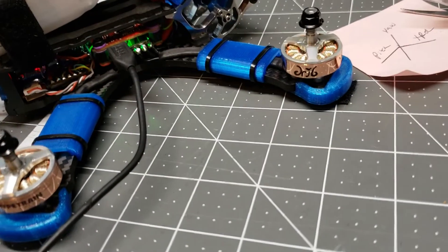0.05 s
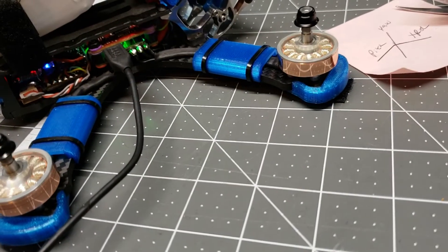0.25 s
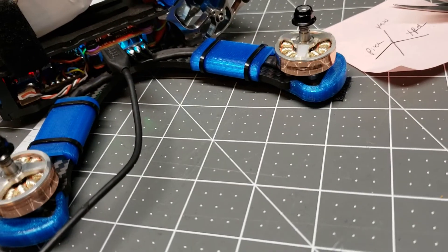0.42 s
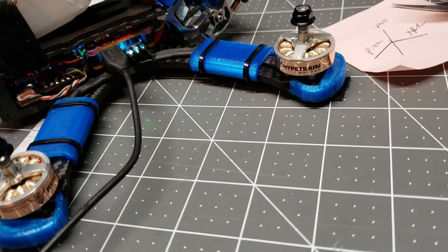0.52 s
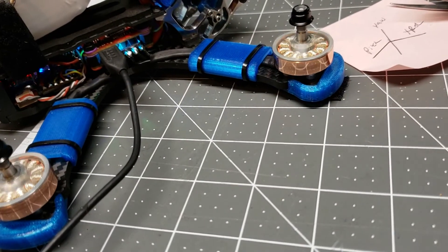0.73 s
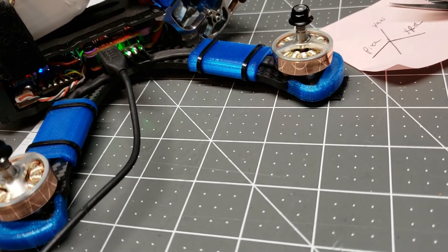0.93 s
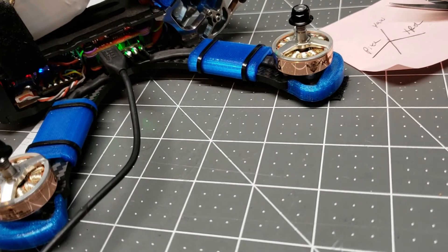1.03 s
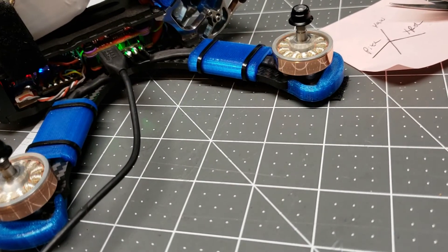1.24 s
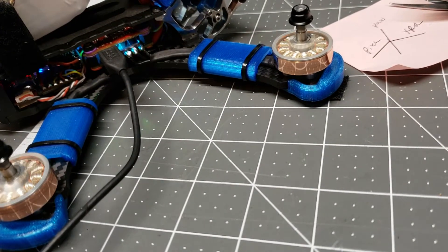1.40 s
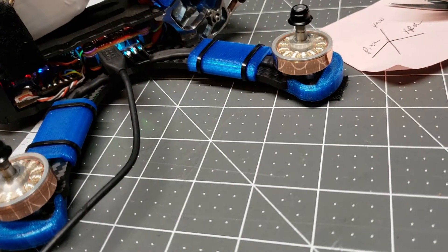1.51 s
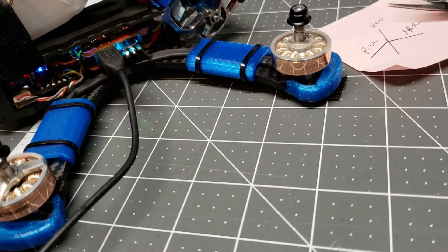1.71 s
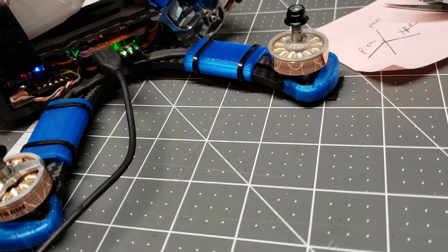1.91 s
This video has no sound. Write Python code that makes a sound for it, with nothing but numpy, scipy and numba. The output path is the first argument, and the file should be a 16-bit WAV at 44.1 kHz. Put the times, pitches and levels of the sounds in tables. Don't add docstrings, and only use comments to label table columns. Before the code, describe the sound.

Small electric drone motors spin up in three quick bursts, each opening with a rough tick and ending in a hard brake; the last holds longest, close to a phone in a small room.

```python
import sys
import numpy as np
from scipy import signal
from scipy.fft import rfft, irfft
from scipy.io import wavfile
from scipy.ndimage import uniform_filter1d
from numba import njit

SR = 44100
rng = np.random.default_rng(int(sys.argv[2]) if len(sys.argv) > 2 else 0)


def log_audio(samples):
    frames = np.atleast_2d(samples).T
    limited = np.clip(frames, -1, 1)
    pcm = np.round(limited * 32767).astype(np.int16)
    wavfile.write(sys.argv[1], SR, pcm)


def undo_db(level):
    steps = np.asarray(level, float) / 20
    return 10 ** steps


N = 85995
T = np.arange(N) / SR


def curve(rows, col=1):
    return np.interp(T, [r[0] for r in rows], [r[col] for r in rows])


def unit(x):
    return x / np.sqrt(np.mean(x ** 2))


def noise():
    return rng.standard_normal(N)


def fade(start_s, fall_s):
    return np.exp(-np.clip(T - start_s, 0, None) / fall_s) * (T > start_s)


def turning(hz, wobble, rate):
    return 2 * np.pi * np.cumsum(hz * (1 + wobble * walk(rate))) / SR


@njit
def svf(x, hz, width):
    y, b, l = np.empty(len(x)), 0., 0.
    g, k = np.tan(np.pi * hz / SR), width / hz
    for i in range(len(x)):
        v = (b + g * (x[i] - l)) / (1 + g * (g + k))
        b, l, y[i] = 2 * v - b, l + 2 * g * v, k * v
    return y


def body(x, peaks):
    return sum((-1) ** k * undo_db(db) * svf(x, 1. * f, 1. * w) for k, (f, w, db) in enumerate(peaks))


def walk(rate):
    k = int(SR / rate)
    steps = np.repeat(rng.standard_normal(N // k + 1), k)
    return 1.4 * uniform_filter1d(uniform_filter1d(steps, k), k)[:N]


def hiss(points):
    p = np.array(points, float)
    f = np.fft.rfftfreq(N, 1 / SR) + 1
    colour_db = np.interp(np.log(f), np.log(p[:, 0]), p[:, 1], left=-90, right=-90)
    return unit(irfft(rfft(noise()) * undo_db(colour_db), N))


def pan(x, db, lag_ms=0.):
    f = np.fft.rfftfreq(N, 1 / SR)
    half_turn = np.pi * f * lag_ms / 1000
    return np.array([irfft(rfft(x) * np.exp(-1j * half_turn * s), N) * undo_db(s * db / 2) for s in (1, -1)])


# [twitch t/s, spin-up t/s, brake t/s, top electrical f/Hz, twitch level/dB, tick level/dB]
BLIPS = [
    (.227, 0.264, .348, 722, -24.5, 4),
    (.778, 0.811, 0.869, 705, -30, -3.5),
    (1.258, 1.290, 1.568, 741, -32.5, -1),
]


def speed():
    rise_s, settle_s, settle_share, brake_s = .027, .08, .07, .042
    hz = np.zeros(N)
    for _, on, off, top, *_ in BLIPS:
        u = np.clip(T - on, 0, off - on)
        climb = 1 - (1 - settle_share) * np.exp(-u / rise_s) - settle_share * np.exp(-u / settle_s)
        hz += top * climb * np.exp(-np.clip(T - off, 0, None) / brake_s)
    return hz


# [t/s, level/dB]
STRAIN = [
    [(.262, -46.5), (.267, -30.5), (.276, -17), (.29, -15.5), (.31, -21), (.33, -15.5), (.362, -24),
     (.385, -17.5), (.41, -30)],
    [(.81, -45), (.823, -19.5), (.835, -18), (.846, -18), (.856, -23), (.87, -22), (.879, -18.5),
     (.895, -22), (.92, -44.5)],
    [(1.292, -49), (1.304, -18.5), (1.316, -20.5), (1.328, -22), (1.34, -28), (1.37, -36.5)],
    [(1.566, -40), (1.572, -28), (1.579, -28), (1.588, -20), (1.6, -23.5), (1.626, -34), (1.64, -47)],
]
# [t/s, level/dB]
KNOCKS = [(0.267, -20.5), (.2737, -10.5), (0.2942, -15.5), (0.3027, -18), (0.313, -15.5), (0.349, -16),
          (0.361, -11.5), (0.379, -17), (0.8232, -17), (0.8417, -17.5), (0.847, -27), (0.8762, -22),
          (0.883, -25), (0.904, -24), (1.3054, -21), (1.325, -19), (1.5735, -24), (1.5844, -15),
          (1.597, -25)]


def spin_strain():
    force = 0
    for rows in STRAIN:
        start, end = rows[0][0] - .004, rows[-1][0] + 0.025
        force = force + undo_db(curve([(start, -90)] + list(rows) + [(end, -90)]))
    ticks = sum(undo_db(-23.5) * fade(b[2], 0.0081) for b in BLIPS)
    knocks = sum(undo_db(db) * fade(s, 0.0034) for s, db in KNOCKS)
    return force + ticks + knocks


# [t/s after its start, level/dB]
TWITCH = [(0, -39.5), (.001, -14), (.008, -0.5), (.014, 5), (.022, -10.5), (.036, -5), (.045, -27.5)]


def twitch_strain():
    force = 0
    for s, _, _, _, db, tick_db in BLIPS:
        shape = [(s - .001, -90)] + [(s + a, b) for a, b in TWITCH] + [(s + 0.05, -90)]
        force = force + undo_db(db + curve(shape)) + undo_db(db + tick_db) * fade(s, 0.0026)
    return force


# [f/Hz, width/Hz, depth 0-1]
WHIRR_DIPS = [(9500, 260, 1), (8330, 160, .6)]


def dips(x):
    return x - sum(np.clip(d, 0, 1) * svf(x, 1. * f, 1. * w) for f, w, d in WHIRR_DIPS)


ORDER = (1, 2, 3, 12, 14, 15, 28)
TONES = [-30, -36, -28, -25, -6, -16, -20]
# [f/Hz, width/Hz, level/dB]
BELL = [(343, 99, -18), (489, 12, -15.5), (637, 56, -20.5), (1924, 960, -23), (4270, 1180, -8.5),
        (6253, 790, -1), (7127, 456, 3), (7717, 530, 1.5), (9400, 1700, -9.5), (14000, 3700, -14.5)]
# [f/Hz, width/Hz, level/dB]
TWITCH_BODY = [(334, 130, -14), (2143, 323, -9.5), (4170, 610, -2.5), (6040, 380, 1.5), (7430, 1000, 2),
               (9100, 560, -9)]
# [f/Hz, level/dB per Hz]
WHIRR = [(59, -64), (100, -25), (621, -27), (721, -21.5), (991, -25.5), (2220, -8), (6840, -9.5),
         (7610, -7.5), (16000, -11)]
# [f/Hz, width/Hz, level/dB]
BELL_RING = [(3993, 830, -44.5), (7600, 36, -49.5)]


def motor(hz, spins, twitches):
    phase = turning(hz, 0.0012, 60) + 6 * rng.random()
    once_a_turn = np.sin(phase / 7)
    run = (hz / 738) ** 3.0
    rasp = noise() * undo_db(1.4 * walk(500) + 0.63 * once_a_turn)
    forced = 0
    for k, db in zip(ORDER, TONES):
        tone = undo_db(db + min(k, 5.0) * walk(70)) * np.sin(k * phase) * (k * hz < 16000)
        forced = forced + tone / (1 + (k * hz / 8300) ** 10)
    forced = forced * np.clip(hz / 600, 0, 1) ** 2.0
    rough = unit(body(rasp, BELL)) * spins + unit(body(rasp, TWITCH_BODY)) * twitches
    out = undo_db(-4.0) * rough + undo_db(6.0) * body(forced * spins, BELL)
    whirr_db = -34.5 + 0.5 * walk(300) + 2.0 * once_a_turn
    out = out + run * undo_db(whirr_db) * dips(hiss(WHIRR))
    ringing = sum(undo_db(db + 4.5) * unit(svf(noise(), 1. * f, 1. * w)) for f, w, db in BELL_RING)
    return out + run ** 2 * ringing


# [speed share, level/dB, pan/dB, port lag/ms]
MOTORS = [(1.0, -3.5, 6.5, 0.092), (.986, -1.5, -11.5, -0.2616), (1.002, -5, 7, 0.592)]


def motors(hz, spins, twitches):
    return sum(pan(undo_db(db) * motor(hz * share, spins, twitches), side, lag) for share, db, side, lag in MOTORS)


RUN_DB = (-40, -52, -42, -40, -39, -45, -62)
PULL_DB = (-20, -44, -21)
# [t/s, level/dB]
HUM_EASE_DB = [(1.46, 0), (1.51, -9)]
# [t/s, level/dB]
PULLS = [(.2, 0), (.5, 0), (.7, -6), (1.1, -6), (1.2, -10)]


def song(hz, spins, hum_db, whine_db):
    phase = turning(hz, .002, 90)
    powered = uniform_filter1d(1. * (np.gradient(hz) >= 0), size=200)
    held = 0
    for k, db in zip(ORDER, RUN_DB):
        extra_db = hum_db + curve(HUM_EASE_DB) if k == 1 else whine_db
        held = held + undo_db(db + extra_db + 2 * walk(30)) * np.sin(k * phase)
    pull = sum(undo_db(db + whine_db + 2 * walk(60)) * np.sin(k * phase) for k, db in zip(ORDER, PULL_DB))
    effort = uniform_filter1d(spins, size=900) * undo_db(curve(PULLS))
    return powered * ((hz / 735) ** 9 * held + effort * (hz / 620) ** 5 * pull)


# [speed share, hum level/dB, whine level/dB, pan/dB, port lag/ms]
VOICES = [(1.0, -14, 1, -2, 0.), (.986, 4, -8, 1, .4)]


def songs(hz, spins):
    return sum(pan(song(hz * share, spins, hum, whine), side, lag) for share, hum, whine, side, lag in VOICES)


# [t/s, level/dB]
RING_DB = [(1.33, -85), (1.36, -30), (1.41, -40), (1.43, -30.5), (1.565, -26), (1.575, -81.5)]


def ring():
    return undo_db(curve(RING_DB) + 1.5 * walk(38)) * np.sin(turning(7810, 0.00042, 88))


# [t/s, electrical f/Hz]
COAST_HZ = [(1.68, 515), (1.73, 480), (1.776, 400), (1.832, 341), (1.91, 251), (1.96, 208)]
# [t/s, level/dB]
COAST = [(1.6, -130), (1.7, -75), (1.73, -64), (1.75, -72), (1.77, -68), (1.8, -59), (1.832, -63),
         (1.866, -65), (1.96, -68)]
COAST_ORDER = (2.0, 9, 12, 14, 24)
COAST_DB = [-8, -22, 2, -12, -24]
# [f/Hz, width/Hz, level/dB]
COAST_BODY = [(900, 120, 0), (3600, 2500, 0), (6250, 250, 9), (8900, 500, 6)]


def coast():
    phase = turning(curve(COAST_HZ), .006, 150)
    tones = sum(undo_db(db + 4 * walk(50)) * np.sin(k * phase) for k, db in zip(COAST_ORDER, COAST_DB))
    bearing = undo_db(-11) * unit(svf(noise(), 2800., 2200.0))
    return body(tones + bearing, COAST_BODY) * undo_db(curve(COAST))


# [t/s, level/dB]
JOLTS = [(0.237, -38.5), (0.272, -44.5), (0.301, -44), (0.357, -35.5), (.378, -40), (.79, -52.5),
         (0.828, -46.5), (.85, -45.5), (0.884, -39.5), (1.269, -50), (1.302, -45), (1.325, -44),
         (1.584, -40), (1.6, -50)]
# [f/Hz, width/Hz, level/dB]
JOLT_MODES = [(86, 82, 1), (166, 190, -1.5), (445, 120, -1)]


def jolts():
    push = sum(undo_db(db) * fade(s, 0.012) for s, db in JOLTS)
    return undo_db(19.0) * body(push * noise(), JOLT_MODES)


def bench():
    t = T - BLIPS[-1][2]
    level = undo_db(-48 + walk(25) - 60 * np.abs(t) / .62)
    return level * np.clip(t / .01, 0, 1) * np.sin(2 * np.pi * 727 * t)


@njit
def walls(x, lags, gain, damp):
    line, soft, out = np.zeros((8, 4096)), np.zeros(8), np.zeros((2, len(x)))
    for i in range(len(x)):
        total = 0.
        for k in range(8):
            soft[k] += (1 - damp) * (gain[k] * line[k, (i - lags[k]) & 4095] - soft[k])
            total += soft[k]
            out[k % 2, i] += soft[k]
        for k in range(8):
            line[k, i & 4095] = x[i] + soft[k] - total / 4
    return out


def echo(x, t60_s, damp, db):
    lags = rng.integers(350, 2200, 8)
    return undo_db(db) * walls(x, lags, undo_db(-60 * lags / SR / t60_s), float(np.clip(damp, 0, .9)))


def room_tail(near):
    room_peaks = [(302, 180, -6.5), (546, 37, -7), (3850, 3300, -12.5), (6640, 1100, 0.0)]
    nook_peaks = [(440.0, 220, 1), (1340, 630, -3.0), (3000, 1000, 0.0), (11200, 10200, -4.5)]
    air_peaks = [(10500, 3200, -3.0), (14500, 3300, -2.5)]
    room = echo(body(near[0], room_peaks), 0.37, 0.071, -12.5)
    nook = echo(body(near[1], nook_peaks), 0.3, 0.24, -13.5)
    air = echo(body(near[1], air_peaks), .3, 0, -20)
    return room + nook + air


# [f/Hz, level/dB per Hz]
OPEN_HISS = [(290, -27.5), (500, -13), (2930, -9), (3650, -7.5), (3810, -9), (7640, -4), (8830, -21),
             (11300, -10.5), (16000, -14.5)]
# [t/s, level/dB]
OPEN_HISS_DB = [(0, -79), (.08, -65.5), (.13, -52), (.22, -47), (.3, -82)]


def opening_hiss():
    return undo_db(curve(OPEN_HISS_DB)) * np.array([hiss(OPEN_HISS), hiss(OPEN_HISS)])


# [f/Hz, level/dB per Hz]
HUM = [(15, -43), (25, -5), (123, -0.5), (275, -7.5), (575, -20.5), (1220, -48.5), (1330, -50),
       (1500, -44.5), (1950, -73), (3300, -120)]
# [t/s, level/dB]
HUM_FADE_DB = [(0, 6), (.25, 10), (.7, -3), (1.2, -5), (1.95, -3.5)]


def hum():
    level = undo_db(-68 + curve(HUM_FADE_DB) + 2 * walk(18))
    return level * (pan(hiss(HUM), -2.3) + 0.83 * np.array([hiss(HUM), hiss(HUM)]))


def scene():
    hz = speed()
    spins, twitches = uniform_filter1d(np.array([spin_strain(), twitch_strain()]), size=30)
    near = motors(hz, spins, twitches) + songs(hz, spins)
    near = near + pan(ring(), -2, 0.039) + pan(coast(), -14, 0.25)
    near = near + pan(jolts(), -11.5) + undo_db(-1.0) * np.array([jolts(), jolts()])
    return near + room_tail(near) + pan(bench(), 1, VOICES[1][4]) + opening_hiss() + hum()


def band_limit(x):
    return signal.sosfilt(signal.butter(12, 17010, fs=SR, output="sos"), x)


def record(dry):
    rounded = np.tanh(dry / 1.489) * 1.48
    top_cut = signal.ellip(10, .3, 70, 15900, fs=SR, output="sos")
    mix = signal.sosfilt(top_cut, rounded)
    return band_limit(mix)


dry = scene()
out = record(dry)
log_audio(out)
```